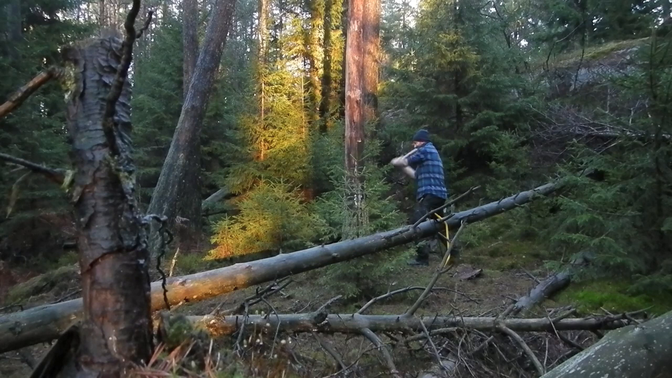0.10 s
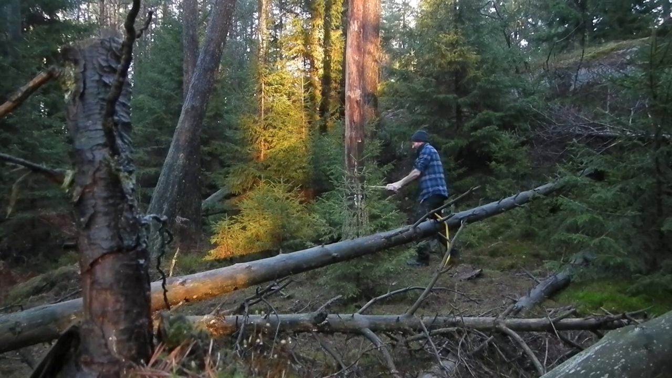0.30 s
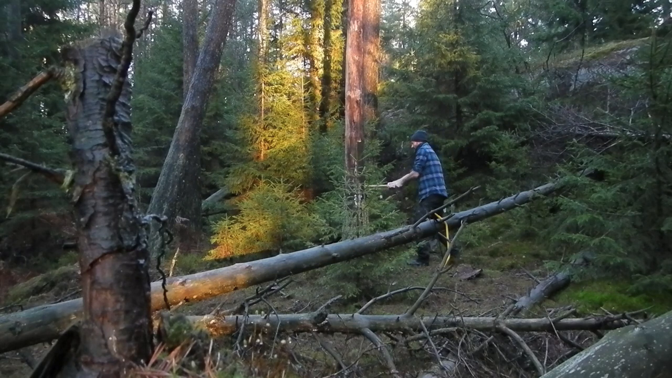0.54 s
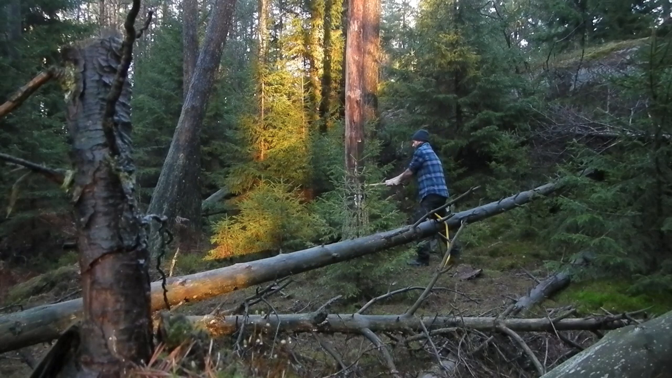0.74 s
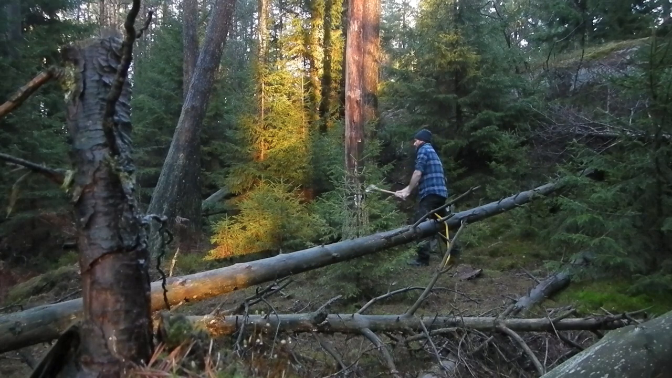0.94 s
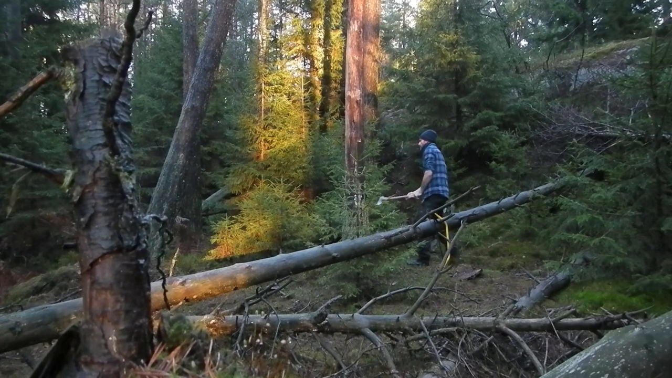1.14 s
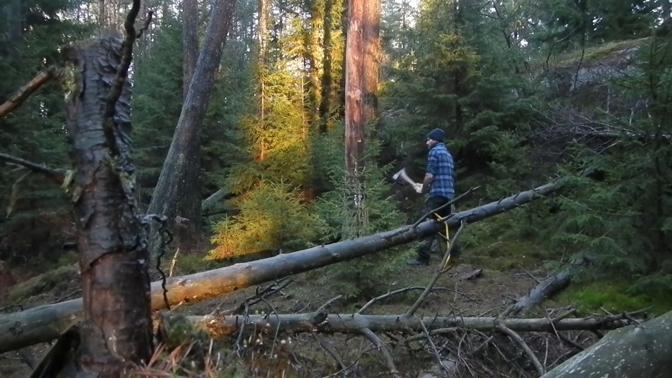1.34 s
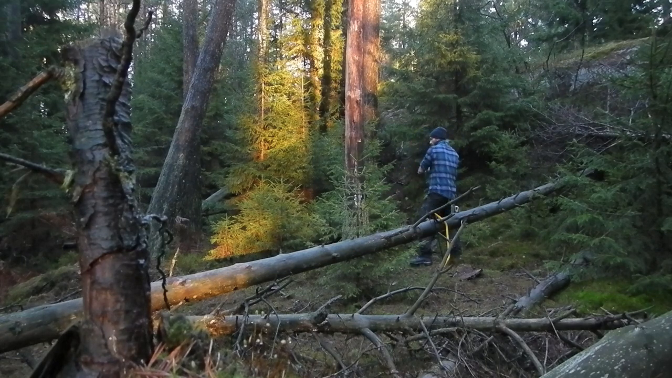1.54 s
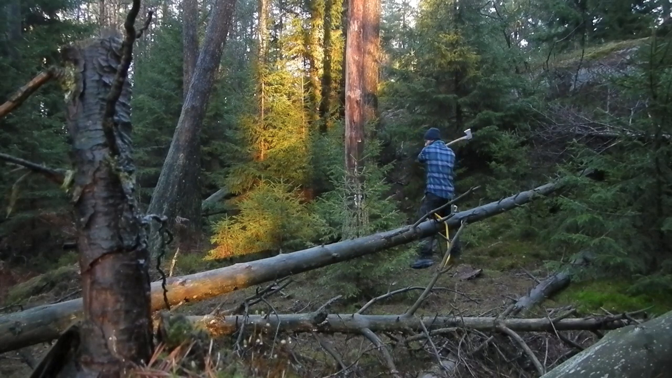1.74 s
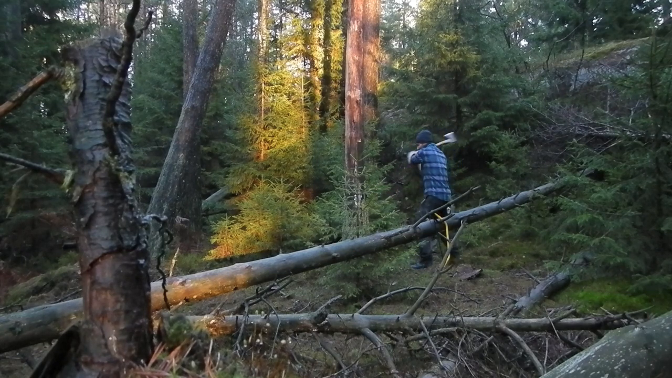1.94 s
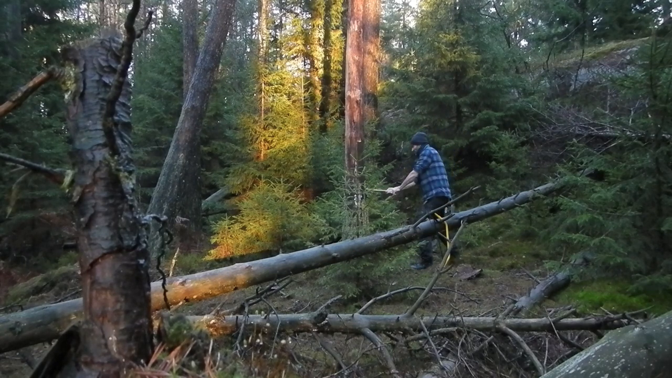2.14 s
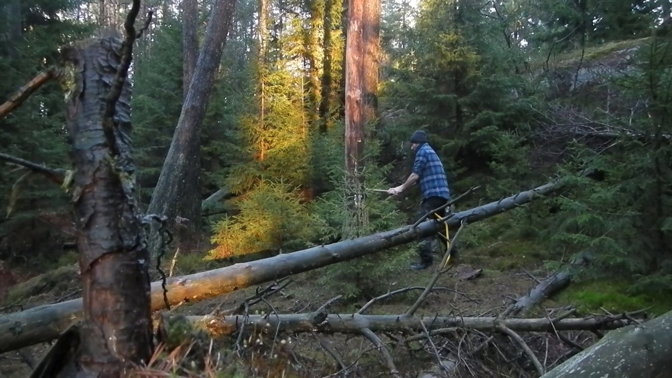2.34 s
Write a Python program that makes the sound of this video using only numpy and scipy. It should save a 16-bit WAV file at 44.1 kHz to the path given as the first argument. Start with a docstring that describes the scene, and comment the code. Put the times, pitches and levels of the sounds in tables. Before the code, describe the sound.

An axe strikes a dry dead tree trunk twice, sharp woody cracks echoing through a quiet forest

```python
"""Axe on a dead trunk

An axe bites twice into a dry, standing dead trunk in a forest. Each blow is a burst of cracking noise,
a short woody ring of sine waves and a low thud. Noise tails stand for the trees that scatter it back.
A few chips land, a faint whoosh leads into the second blow, and a hiss and a thin electrical whine lie
below. The recorder's gain control ducks at each blow and creeps back up."""
import sys
import numpy as np
from scipy import signal
from scipy.fft import rfft, irfft, next_fast_len
from scipy.io import wavfile
from scipy.ndimage import uniform_filter1d, map_coordinates

SR = 44100
rng = np.random.default_rng(int(sys.argv[2]) if len(sys.argv) > 2 else 0)


def output_pcm(signal):
    """Save a mono or channel-first signal as 16-bit PCM at the path in sys.argv[1].

    Samples are clipped to [-1, 1] before scaling.
    """
    pcm = np.clip(np.atleast_2d(signal).T, -1, 1) * 32767
    wavfile.write(sys.argv[1], SR, np.round(pcm).astype(np.int16))


N = 110250  # length in samples, 2.5 seconds


def amp(db):
    """Turn decibels into a gain."""
    return 10 ** (np.asarray(db) / 20)


def unit(x):
    """Scale to an average strength (rms) of 1."""
    return x / np.sqrt(np.mean(x ** 2) + 1e-20)


def along(points, hz):
    """Read a curve of (Hz, value) points on a log frequency axis."""
    f, values = np.transpose(points)
    return np.interp(np.log(hz + 1), np.log(f + 1), values)


def wobble(hz):
    """A smooth random curve through hz new random points a second."""
    return map_coordinates(rng.standard_normal(4096), [np.arange(N) * hz / SR], mode="wrap")


def filtered(x, response):
    """Multiply the spectrum of x by a response that depends on frequency."""
    size = next_fast_len(N + SR // 2)  # spare room keeps the end from wrapping onto the start
    hz = np.fft.rfftfreq(size, 1 / SR)
    return irfft(rfft(x, size) * response(hz), size)[..., :N]


def noise(spectrum, side):
    """Coloured stereo noise of rms 1: a shared middle, plus a side part that widens it."""
    def colour(hz):
        middle_db = along(spectrum, hz)
        return amp([middle_db, middle_db + along(side, hz)])

    middle, sides = filtered(rng.standard_normal((2, N)), colour)
    return unit(np.array([middle + sides, middle - sides]))


def fade(t, t60):
    """Exponential decay that drops 60 dB in t60 seconds."""
    return np.exp(-np.log(1000) * t / t60)


def placed(x, s):
    """Delay x so that it starts at s seconds."""
    return np.pad(x, ((0, 0), (max(int(s * SR), 0), 0)))[:, :N]


# The axe blows. Each row: start in seconds, level in dB, then six levels in dB relative to the blow:
# crack, thud, bark rustle, near echo, far echo (each echo on top of its own knock) and swing.
BLOWS = [(0.221, 6, -8.5, -27.5, -35, -14, -9, -97), (2.0997, 4, -6, -24.5, -33, -9, -7.5, -52.5)]
# Stereo width of the blow noises. Each row: frequency in Hz, side over middle in dB.
BLOW_SIDE = [(60, -20), (300, -15), (1000, -17), (3000, -12), (5000, -16), (8000, -4), (15000, 4)]
BLOW_LEFT_DB = 1.3  # left is raised and right lowered by this much


def axe():
    """Each blow: fibres crack, the trunk rings and thuds, loose bark rustles, the forest answers."""
    t = np.arange(N) / SR
    out = np.zeros((2, N))
    for index, (s, db, crack_db, thud_db, bark_db, near_db, far_db, _) in enumerate(BLOWS):
        knock = amp(crack_db) * crack(t) + trunk(t, index) + push(t)
        body = amp(thud_db) * thud(t) + amp(bark_db) * bark(t)
        mono = knock.mean(axis=0)
        loud_start = mono * bite(t / 2)  # only this part carries to the far trees
        near = amp(near_db) * forest(mono, NEAR_COLOUR, NEAR_T60, NEAR_RISE_S)
        far = amp(far_db) * forest(loud_start, FAR_COLOUR, FAR_T60, FAR_RISE_S)
        out += amp(db) * placed(knock + body + near + far, s)
    return out * amp([[BLOW_LEFT_DB], [-BLOW_LEFT_DB]])


BITE_S, RELEASE_S = 0.00488, 0.0012  # blade travel, and how softly it stops


def bite(t):
    """Near 1 while the blade drives into the wood, then a smooth fall to 0."""
    return .5 - .5 * np.tanh((t - BITE_S) / RELEASE_S)


# Colour of the splintering crack. Each row: frequency in Hz, relative level in dB.
CRACK = [(60, -26), (300, -36), (700, -1.5), (1500, 3.5), (3000, 8.5), (4200, -6), (5500, -4.5),
         (7800, -24), (10500, -13), (13000, -24.5), (16000, -36)]
CRACK_RISE_S, CRACK_T60 = 0.00029, 0.077  # rise time constant and decay, in seconds


def crack(t):
    """Fibres splinter: a noise burst that starts sharply and ends with the bite."""
    envelope = bite(t) * fade(t, CRACK_T60) * -np.expm1(-t / CRACK_RISE_S)
    return noise(CRACK, BLOW_SIDE) * envelope


# Ringing tones (modes) of the trunk; each cut lands on another spot, so the levels change.
# Each row: frequency in Hz, t60 (time to fall 60 dB) in seconds, level in dB in the first blow,
# level in dB in the second.
TRUNK = [(382, 0.011, -49, -23), (600, 0.018, -5.5, -14), (850, 0.028, -6.5, -18.5), (984, 0.04, -2.5, -9),
         (1223, 0.05, -11.5, -9.5), (1464, 0.047, -8.5, -7), (1894, 0.025, -3, -35),
         (2386, 0.024, -17, -16.5), (2619, 0.014, -4.5, -8.5), (3086, 0.018, -6.5, -18),
         (3637, 0.045, -9.5, -36), (4170, 0.044, -17.5, -14.5), (5240, 0.017, -24, -15)]
FREE_RING_DB = -6  # ring left after the bite
RISE_CYCLES, DRIVE_CYCLES = 3.77, 10  # time constants, in cycles of each mode: build-up, sag of the drive
WOOD_ROUGH, ROUGH_HZ = 0.24, 486  # phase wander in radians, and its random points per second


def trunk(t, index):
    """The modes are driven during the bite, the high ones sagging first, then ring freely and briefly."""
    out = np.zeros(N)
    drive = bite(t)
    for k, (hz, t60, *levels) in enumerate(TRUNK):
        build_up = -np.expm1(-t * hz / RISE_CYCLES)
        sag = np.exp(-np.minimum(t, BITE_S) * hz / DRIVE_CYCLES)  # the bite grows duller
        free = (1 - drive) * amp(FREE_RING_DB) * fade(np.maximum(t - BITE_S, 0), t60)
        phase = 2 * np.pi * hz * t + WOOD_ROUGH * drive * wobble(ROUGH_HZ)
        tone = np.sqrt(2) * np.sin(phase)
        out += (-1) ** k * amp(levels[index]) * build_up * sag * (drive + free) * tone
    return out


STOP_HZ, STOP_S, STOP_DB, STOP_T60 = 135, 0.00385, -21, 0.024  # pitch, start, level in the blow, decay


def push(t):
    """One low shove, a fading sine, as the trunk takes the weight of the axe."""
    u = np.maximum(t - STOP_S, 0)
    return amp(STOP_DB) * np.sin(2 * np.pi * STOP_HZ * u) * fade(u, STOP_T60)


# Colour of the low thud. Each row: frequency in Hz, relative level in dB.
THUD = [(25, -28), (55, -11), (100, -2), (190, 1.5), (260, -9), (350, -11.5), (480, -18.5), (900, -6),
        (3000, -34)]
THUD_RISE_S, THUD_T60 = 0.0019, 0.27  # rise time constant and decay, in seconds


def thud(t):
    """The low thud of the trunk: deep noise that swells quickly and dies away."""
    return noise(THUD, BLOW_SIDE) * -np.expm1(-t / THUD_RISE_S) * fade(t, THUD_T60)


# Colour of the bark rustle. Each row: frequency in Hz, relative level in dB.
BARK = [(300, 18), (1500, -7), (2600, -30.5), (3600, -6), (5000, 4), (7500, -8.5), (10500, -4),
        (13000, -20), (16000, -59)]
BARK_T60, BARK_GRAIN, BARK_GRAIN_HZ = 0.47, 0.22, 466  # decay in s, unevenness, random points per second


def bark(t):
    """Loose bark rustles: uneven noise that fades."""
    grainy = noise(BARK, BLOW_SIDE) * np.exp(BARK_GRAIN * wobble(BARK_GRAIN_HZ))
    return unit(grainy) * fade(t, BARK_T60)


# Colour of the near and far echoes. Each row: frequency in Hz, relative level in dB.
NEAR_COLOUR = [(100, -1), (350, 2), (600, -1), (1000, 4), (2000, 3.5), (3200, -1.5), (5200, 3), (8000, -1),
               (15000, -3)]
FAR_COLOUR = [(60, -2), (200, -5), (400, -3), (570, -7.5), (800, -3), (1000, -0.5), (1500, -6),
              (2000, -6.5), (3200, -13), (5200, -9), (15000, -22)]
# How long the echoes last. Each row: frequency in Hz, t60 in seconds.
NEAR_T60 = [(200, 0.26), (1000, 0.25), (4000, 0.17), (12000, 0.17)]
FAR_T60 = [(200, 0.62), (1000, 1.37), (3000, 1.01), (12000, 0.32)]
NEAR_RISE_S, FAR_RISE_S = 0.0047, 0.12  # how late each tail swells up
ECHO_GRAIN, ECHO_GRAIN_HZ = 0.14, 130  # lumpiness, and its random points per second


def forest(x, colour, t60s, rise_s):
    """Many trunks scatter the sound back in a lumpy noise tail, each pitch range fading at its own rate."""
    t = np.arange(N) / SR
    flat = [(20, 0), (20000, 0)]
    scatter = noise(flat, BLOW_SIDE) * np.exp(ECHO_GRAIN * wobble(ECHO_GRAIN_HZ))
    hz, frames, bands = signal.stft(scatter, SR, nperseg=256)
    bands = bands * fade(frames, along(t60s, hz)[:, None])
    tail = signal.istft(bands, SR, nperseg=256)[1][:, :N]
    tail = tail * -np.expm1(-(t / rise_s) ** 2)
    tail /= np.sqrt(np.sum(fade(t, t60s[1][1]) ** 2))  # levelled by the second t60 in the table
    tail = filtered(tail, lambda f: amp(along(colour, f)))
    return signal.fftconvolve(x[None], tail, axes=1)[:, :N]


SWING_S = 0.055  # length of the whoosh; it is heard only before the second blow
SWING_FROM_HZ, SWING_TO_HZ = 300, 717
SWING_WIDTH_HZ = 150  # random points per second; more makes the whoosh wider in pitch


def swing():
    """The axe head speeds up: a narrow whoosh rises in pitch and level until it lands (BLOWS sets how loud)."""
    t = np.arange(N) / SR
    out = np.zeros(N)
    for s, db, *_, swing_db in BLOWS:
        speed = np.clip(1 + (t - s) / SWING_S, 0, 1)
        pitch = SWING_FROM_HZ + (SWING_TO_HZ - SWING_FROM_HZ) * speed
        phase = 2 * np.pi * np.cumsum(pitch) / SR
        whoosh = wobble(SWING_WIDTH_HZ) * np.sin(phase) + wobble(SWING_WIDTH_HZ) * np.cos(phase)
        out += amp(db + swing_db) * speed * (t < s) * whoosh
    return out


# Chips landing. Each row: start in seconds, level in dB.
CHIPS = [(0.468, -48), (0.517, -41.5), (2.455, -51)]
# Colour of a landing chip. Each row: frequency in Hz, relative level in dB.
CHIP = [(500, -4), (2500, 1), (5500, -4.5), (9000, -17), (13000, -7), (16000, -35)]
CHIP_T60 = 0.033  # seconds


def chips():
    """Chips of wood tick on the forest floor: short fading noise bursts."""
    t = np.arange(N) / SR
    return sum(placed(amp(db) * noise(CHIP, BLOW_SIDE) * fade(t, CHIP_T60), s) for s, db in CHIPS)


# Colour of the hiss. Each row: frequency in Hz, relative level in dB.
HISS = [(25, -18), (70, -8.5), (130, -8.5), (280, -11.5), (450, -13.5), (800, -15.5), (1000, -6.5),
        (1330, -10), (1530, -15.5), (1720, -15), (1880, -3.5), (2220, -0.5), (2560, -5), (2820, -18),
        (4000, -15), (5700, -25), (7200, -18), (9500, -28), (12000, -27.5), (13500, -35), (14500, -68)]
# Stereo width of the hiss. Each row: frequency in Hz, side over middle in dB.
HISS_SIDE = [(60, -5), (110, -4.5), (200, -3), (380, -1.5), (700, -2), (1290, -5), (2380, -12), (4400, 2.5),
             (8120, -3), (15000, -1.5)]
# Stereo balance of the hiss. Each row: frequency in Hz, left over right in dB.
HISS_BALANCE = [(60, 8.5), (110, -4.5), (200, 6.5), (380, 0), (700, 2), (1290, -8), (2380, 4.5),
                (4400, -5.5), (8120, 1), (15000, -6)]
HISS_DB, HISS_WAVER_DB = -46, 0.62  # level before gain control, waver
HISS_WAVER_HZ = 9.8  # random points per second


def hiss():
    """A steady noise, strongest near 2 kHz, whose level wavers slightly."""
    halves = np.array([[.5], [-.5]])  # half the balance up on the left, half down on the right
    bed = filtered(noise(HISS, HISS_SIDE), lambda hz: amp(along(HISS_BALANCE, hz) * halves))
    return unit(bed) * amp(HISS_DB + HISS_WAVER_DB * wobble(HISS_WAVER_HZ))


WHINE_HZ = 14835
WHINE_DB, WHINE_WAVER_DB = -60.5, 1.9  # level before gain control, waver
WHINE_WAVER_HZ = 26.04  # random points per second


def whine():
    """A thin electrical whine: one high sine wave whose level wavers."""
    tone = np.sqrt(2) * np.sin(2 * np.pi * WHINE_HZ * np.arange(N) / SR)
    return tone * amp(WHINE_DB + WHINE_WAVER_DB * wobble(WHINE_WAVER_HZ))


def scene():
    """The chopping over the quiet background."""
    return swing() + axe() + chips() + hiss() + whine()


LIMIT_DB, DETECT_S = -9, 0.0036  # gain control threshold, and the span over which loudness is averaged
QUICK_DB_PER_S, RECOVER_DB_PER_S = 52, 12  # fast and slow recovery
HELD_SHARE = 0.98  # share of the ducking that recovers slowly
CEILING, TOP_HZ = 0.84, 15900  # peak level, top of the band


def record(dry):
    """Gain control ducks at once and recovers, first fast, then slowly; peaks round off; the top is cut."""
    t = np.arange(N) / SR
    span = max(int(DETECT_S * SR), 1)
    power = np.abs(uniform_filter1d(np.mean(dry ** 2, axis=0), span))
    over_db = np.maximum(10 * np.log10(power + 1e-12) - LIMIT_DB, 0)

    def held(depth, speed):
        """Follow rises at once, then let go by speed dB a second."""
        return np.maximum.accumulate(depth + speed * t) - speed * t

    quick = held(over_db, QUICK_DB_PER_S)
    slow = held(HELD_SHARE * over_db, RECOVER_DB_PER_S)
    y = dry * amp(-np.maximum(quick, slow))
    y = y / (1 + (y / CEILING) ** 8) ** (1 / 8)
    return filtered(y, lambda hz: 1 / (1 + (hz / TOP_HZ) ** 100))


dry = scene()
out = record(dry)
output_pcm(out)
```